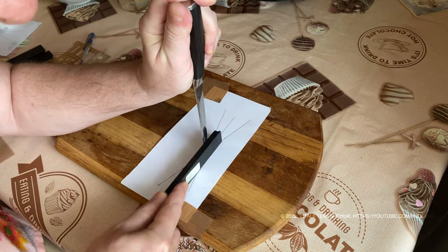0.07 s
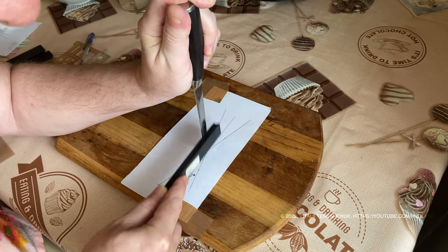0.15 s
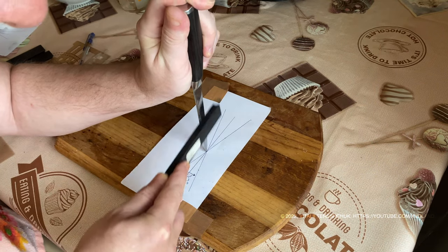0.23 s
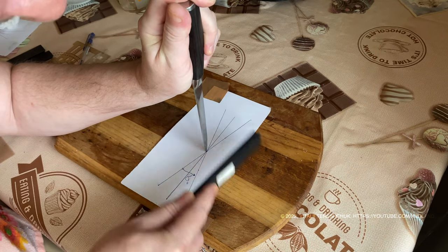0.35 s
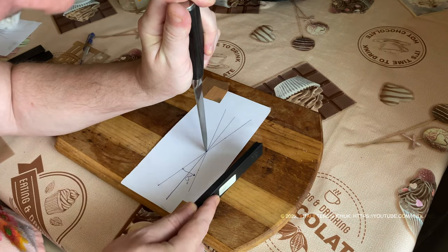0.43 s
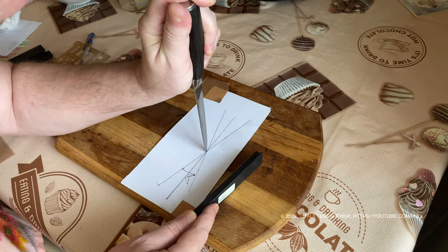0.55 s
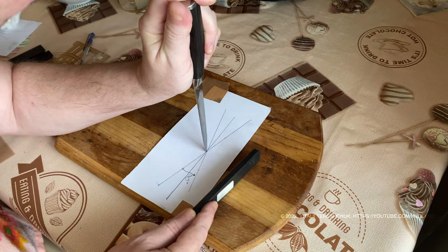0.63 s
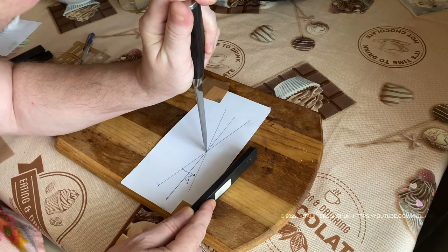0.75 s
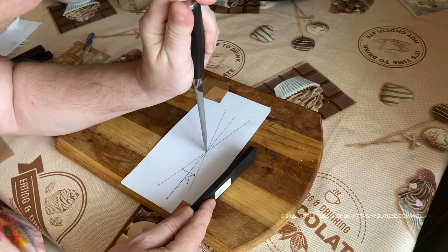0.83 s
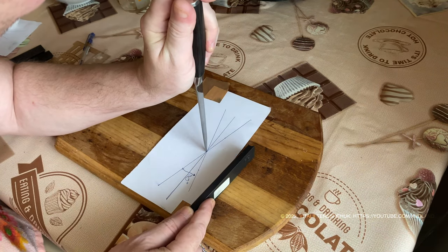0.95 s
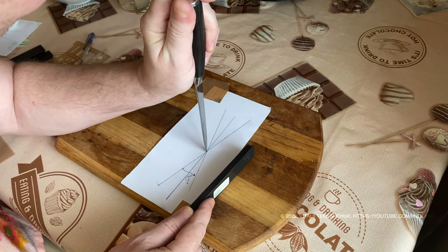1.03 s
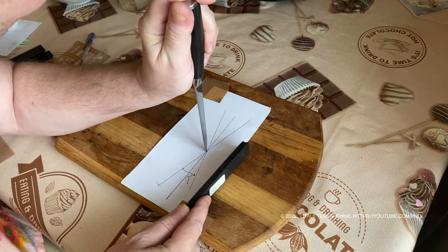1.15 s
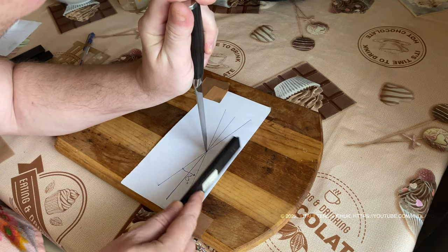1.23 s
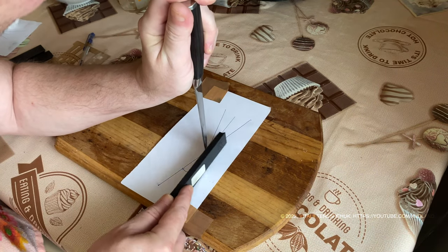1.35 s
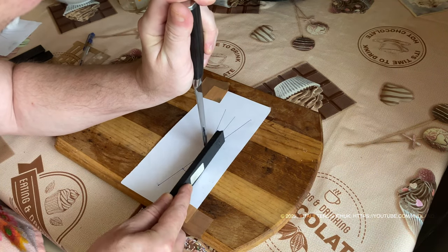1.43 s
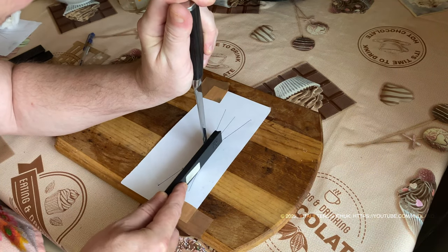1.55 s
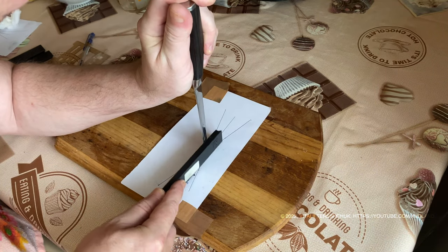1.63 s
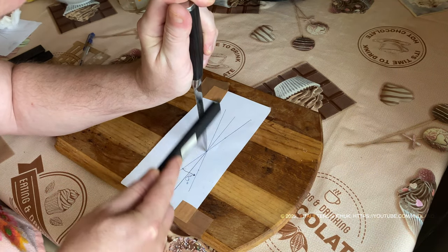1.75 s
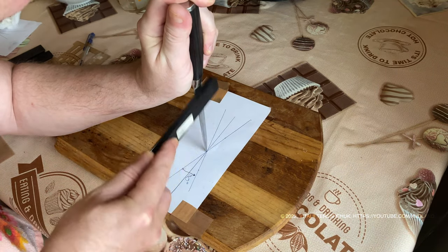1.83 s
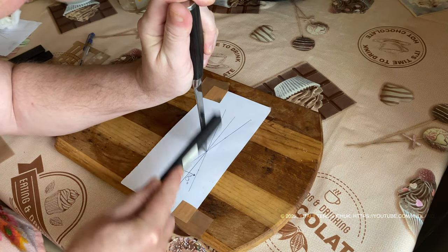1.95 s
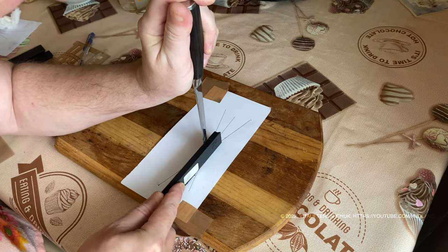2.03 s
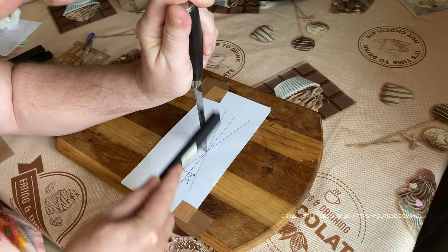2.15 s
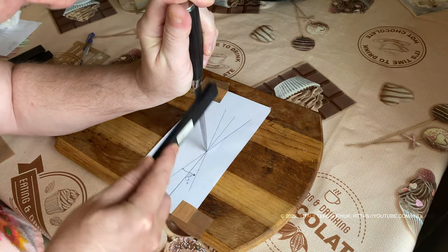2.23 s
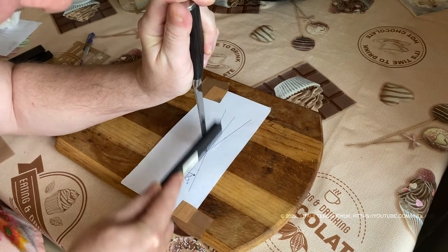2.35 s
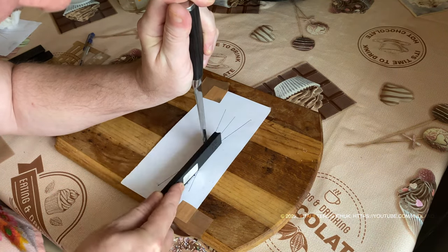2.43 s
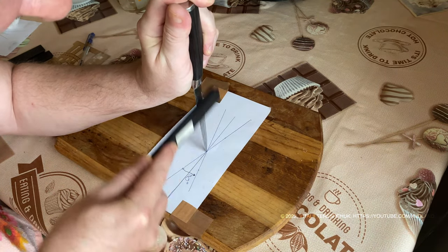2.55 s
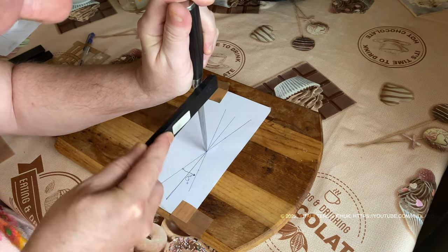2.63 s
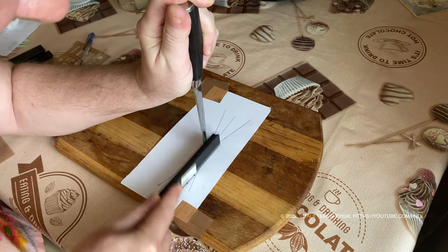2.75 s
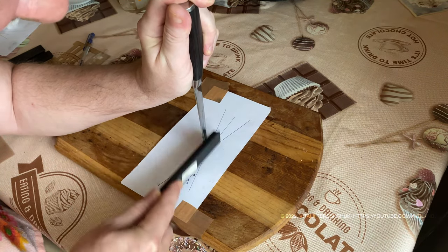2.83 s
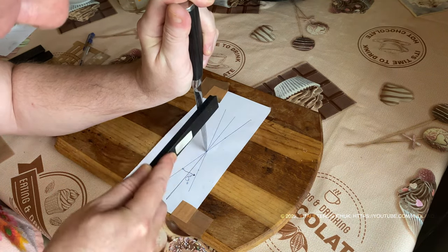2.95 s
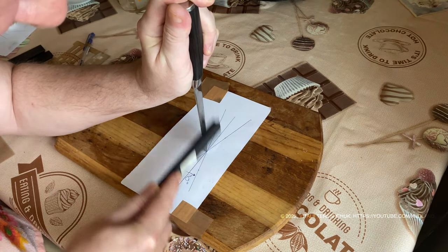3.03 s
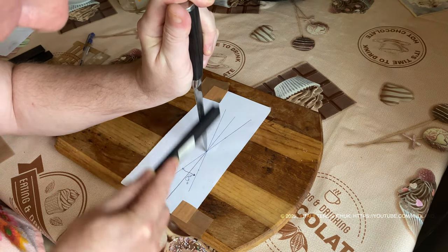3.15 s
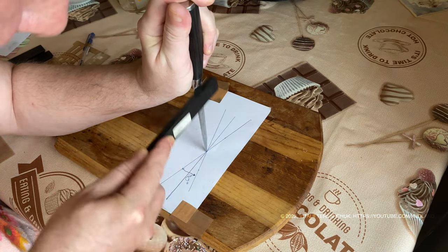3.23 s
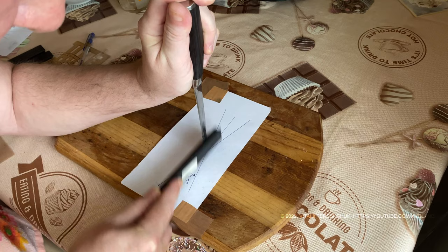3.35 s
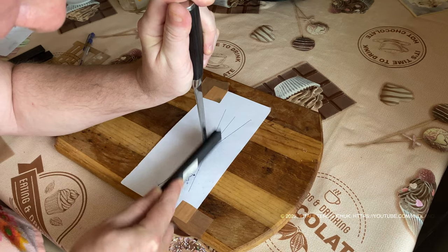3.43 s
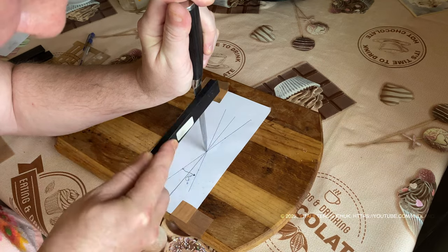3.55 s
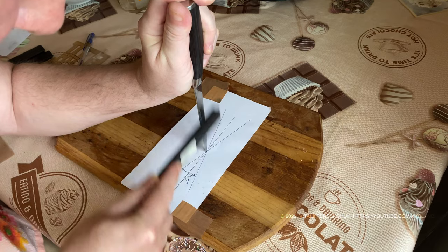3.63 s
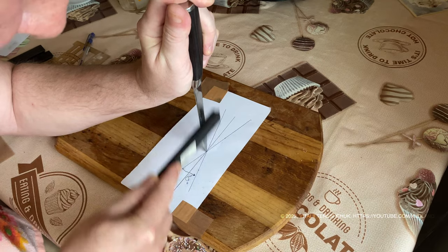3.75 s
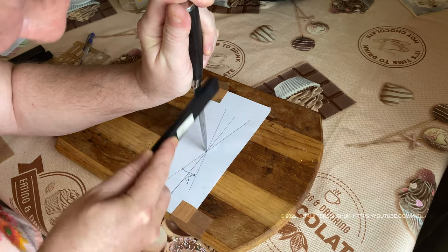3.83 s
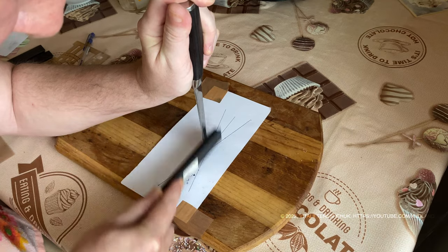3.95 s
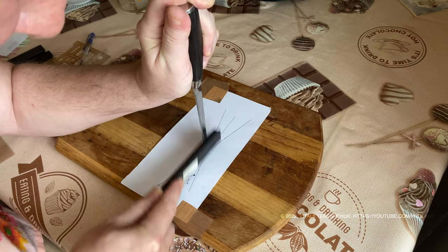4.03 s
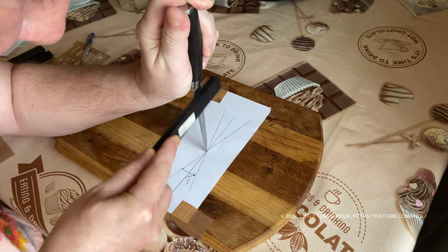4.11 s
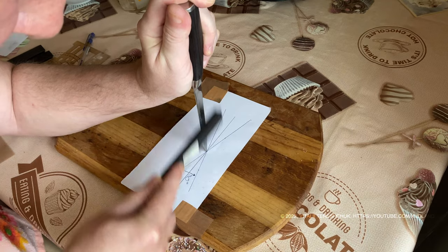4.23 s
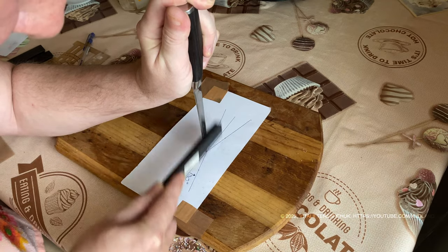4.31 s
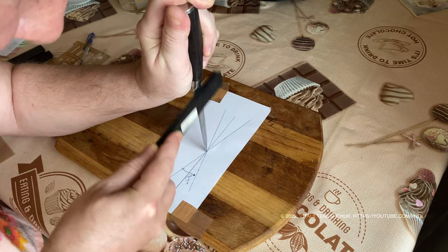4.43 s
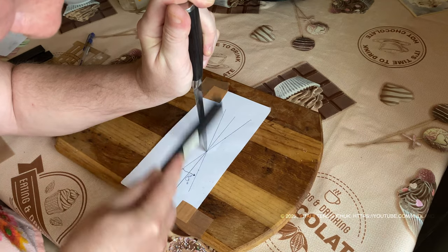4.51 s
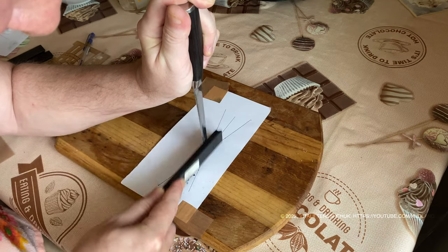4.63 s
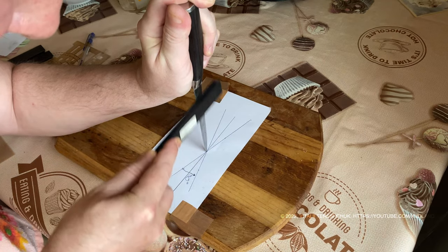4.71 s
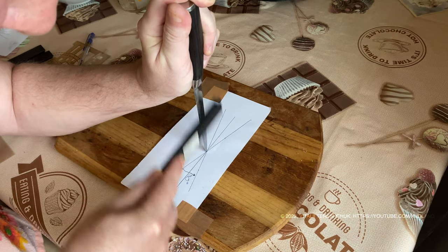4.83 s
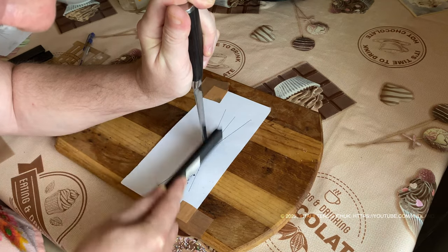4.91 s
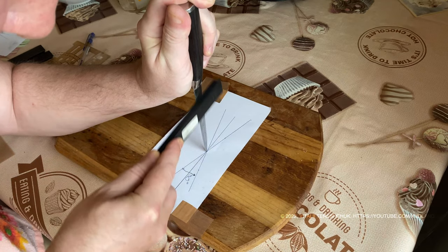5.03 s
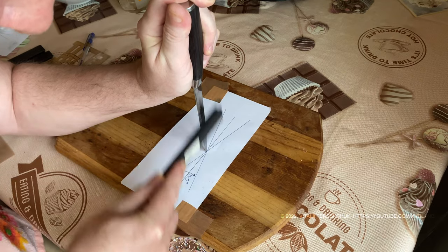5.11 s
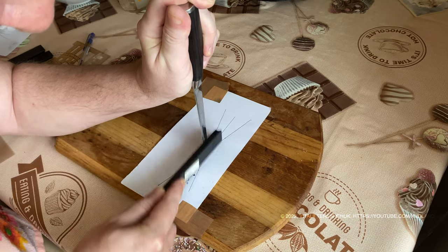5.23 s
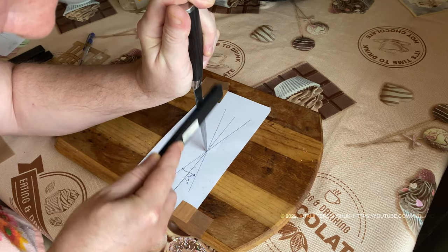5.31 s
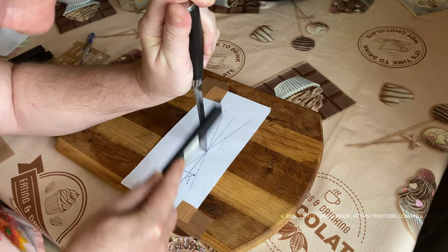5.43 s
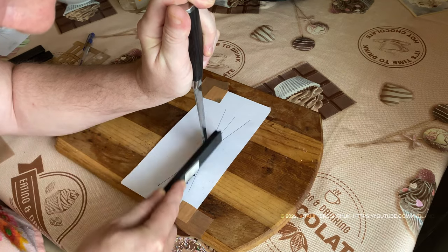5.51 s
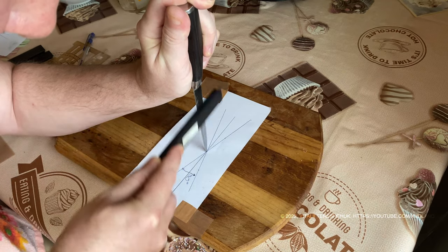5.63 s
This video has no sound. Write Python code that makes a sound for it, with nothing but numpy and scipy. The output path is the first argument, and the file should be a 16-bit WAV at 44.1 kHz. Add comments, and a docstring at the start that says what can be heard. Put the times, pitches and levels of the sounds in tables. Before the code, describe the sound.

A sharpening bar is worked by hand along a steel kitchen knife standing on its tip on a wooden board. A knock and a brief scrape give way to a pause with a few lighter taps. Then quick back-and-forth strokes run on, thin, high and gritty, with frequent sharp knocks that briefly ring the blade and board. The microphone is close, in a small room with a faint low background noise.

```python
"""A small room: a sharpening bar is drawn along a kitchen knife standing on its tip on a wooden board.
On each stroke grit rasps on the edge, rings the blade and shakes the board.
At the turns the bar knocks; knife, board and table ring briefly.
A hand-held pair of microphone ports sits close by and also picks up short reflections and room tone."""
import sys
import numpy as np
from scipy import signal
from scipy.fft import rfft, irfft
from scipy.io import wavfile
from scipy.ndimage import uniform_filter1d

SR = 44100
rng = np.random.default_rng(int(sys.argv[2]) if len(sys.argv) > 2 else 0)


def materialize(psi):
    """Save the field psi as 16-bit PCM at rate SR to the path in sys.argv[1].

    A 1-D psi becomes a single channel; in a 2-D psi each row is a channel.
    """
    bounded = np.clip(np.atleast_2d(psi).T, -1, 1)
    quanta = np.round(bounded * 32767).astype(np.int16)
    wavfile.write(sys.argv[1], SR, quanta)


N = 250047

# modes of knife and board together: (frequency [Hz], level [dB], t60 [s])
BODY_MODES = [(464, -0.5, 0.028), (572, 3.5, 0.032), (677.3, 6, 0.044), (692.5, 9, 0.036), (836, 11, 0.028),
              (896.6, 1, 0.093), (947.5, 4.5, 0.052), (1153, -1.5, 0.056), (1235, 9, 0.037),
              (1437, 0, 0.032), (1326, -0.5, 0.093), (1471.3, 8, 0.1), (1525, -16.5, .07),
              (1574, -3, 0.095), (1778, -4.5, 0.028), (1960, -4.5, 0.065), (2140, 0, 0.013),
              (2413, -10, 0.13), (2474, 4, 0.012), (2815, -5, 0.04), (3284, -6, 0.034), (3833, -3.5, 0.09),
              (4630, -14.5, 0.22), (5030, -25.5, .1)]


def gain_of(db):
    """dB to gain."""
    return 10 ** (np.asarray(db) / 20)


def unit_rms(x):
    """Scales to rms 1."""
    return x / np.sqrt(np.mean(x ** 2) + 1e-20)


def unit_peak(x):
    """Scales to peak 1."""
    return x / abs(x).max()


def curve_at(points, hz):
    """Interpolates a (frequency [Hz], value) table on a log-frequency axis."""
    point_hz, value = np.transpose(points)
    return np.interp(np.log(hz + 1), np.log(point_hz + 1), value)


def coloured(x, points):
    """Filters by a (frequency [Hz], gain [dB]) table."""
    hz = np.fft.rfftfreq(x.shape[-1], 1 / SR)
    return irfft(rfft(x) * gain_of(curve_at(points, hz)), x.shape[-1])


def add(mix, start_s, sound):
    """Mixes in a two-channel sound."""
    part = mix[:, round(start_s * SR):][:, :sound.shape[1]]
    part += sound[:, :part.shape[1]]


def diffuse_noise(coherence, size):
    """Two-channel noise with a given left-right coherence per frequency."""
    left, other = rfft(rng.standard_normal((2, size)))
    shared = np.clip(curve_at(coherence, np.fft.rfftfreq(size, 1 / SR)), -1, 1)
    return irfft(np.array([left, shared * left + np.sqrt(1 - shared ** 2) * other]), size)


def resonate(x, hz, width_hz):
    """Moving band-pass: shifts hz down to zero, smooths twice, shifts back."""
    carrier = np.exp(2j * np.pi * np.cumsum(hz) / SR)
    pole = np.exp(-np.pi * width_hz / SR)
    smoothed = signal.lfilter([(1 - pole) ** 2], [1, -2 * pole, pole * pole], x / carrier)
    return 2 * (carrier * smoothed).real


def ring(modes, colour, spread_db, t60_factor=1.):
    """Modes after one tap; the spot struck favours some over others."""
    hz, db, t60_s = np.transpose(modes)[:, :, None]
    t = np.arange(SR // 2) / SR
    db = db + curve_at(colour, hz) + spread_db * rng.standard_normal(hz.shape)
    sign = (-1.) ** np.arange(len(hz))[:, None]  # neighbouring modes move in opposition
    return (sign * gain_of(db - 60 * t / (t60_s * t60_factor)) * np.sin(2 * np.pi * hz * t)).sum(0)


def radiated(x):
    """The small board radiates little bass."""
    return signal.sosfilt(signal.butter(4, 430, "high", fs=SR, output="sos"), x)


def room_tone():
    """Steady low noise, alike on both sides in the bass."""
    # room tone: (frequency [Hz], density [dB])
    spectrum = [(12, -43.5), (20, -20), (48, -7.5), (103, -9), (167, -10), (205, -12.5), (233, -13.5),
                (341, -10), (369, -15), (1020, -16), (2640, -29.5), (4750, -25), (9000, -44.5),
                (11700, -83), (19800, -120)]
    # left-right likeness: (frequency [Hz], coherence [-1..1])
    coherence = [(60, 1), (150, 1), (350, 0.21), (900, 0.12), (1700, -0.07), (3000, -0.12)]
    return gain_of(-63) * unit_rms(coloured(diffuse_noise(coherence, N), spectrum))


def reflections(x):
    """Short tail, each band dying at its own rate; two tails alternate as the hands move."""
    # room decay: (frequency [Hz], t60 [s])
    decay = [(60, 1), (160, 0.46), (420, 0.32), (1100, 0.25), (2900, 0.24), (7700, 0.3), (12000, 0.063)]
    # reflection strength: (frequency [Hz], gain [dB])
    colour = [(100, -6), (300, 3.5), (700, -1), (1500, 2), (4000, 1), (10000, -6)]
    # left-right likeness: (frequency [Hz], coherence [-1..1])
    coherence = [(90, .97), (160, .85), (300, .2), (1000, 0), (3000, -.1), (8500, 0), (10000, .7)]
    out, t = np.zeros((2, N)), np.arange(N) / SR
    x = coloured(x, colour)
    for share in (np.cos(2.044 * t), np.sin(2.03 * t)):
        hz, lag_s, bands = signal.stft(diffuse_noise(coherence, SR // 2), SR, nperseg=256)
        fade = gain_of(-60 * lag_s / curve_at(decay, hz)[:, None])
        tail = signal.istft(bands * fade, SR, nperseg=256)[1]
        tail *= np.clip(np.arange(tail.shape[1]) / SR / 0.0082 - .3, 0, 1)  # delay to the first walls
        out += signal.fftconvolve((x * share)[None], tail / np.linalg.norm(tail[0]), axes=1)[:, :N]
    return out


def ports(x):
    """Near sound reaches the two ports with its own balance and lead at each frequency."""
    # port balance: (frequency [Hz], left over right [dB])
    balance = [(100, 0), (250, 1), (1500, -.5), (2800, 2), (5500, 5), (7200, 1), (10000, 0)]
    # port phase: (frequency [Hz], left lead [rad])
    lead = [(100, 0), (400, .3), (1700, .1), (2400, 1.2), (4000, 2.1), (4700, 1), (6000, -.8), (7000, -1.3),
            (8000, -3.1), (9000, -5), (9500, -6), (12000, -6.28)]
    hz = np.fft.rfftfreq(N, 1 / SR)
    left = gain_of(curve_at(balance, hz) / 2) * np.exp(.5j * curve_at(lead, hz))
    return irfft(rfft(x) * np.array([left, 1 / left]), N)


def knocks():
    """The bar lands and chatters: board and knife ring, the steel cracks, the table thumps."""
    # blows: (time [s], level [dB], thump [dB], board [dB], knife [dB], crack [dB], snap [dB],
    # t60 [factor]); thump to snap are relative; a bar kept pressed on the edge shortens the ring
    blows = [(0.014, -10, -29, 4, 4.5, -14, -27, 0.74), (0.483, -17.5, -28.5, 2.5, -6.5, -16, -30, 0.61),
             (1.307, -24.5, -26, 12, 8.5, -30, -27, 0.55), (1.444, -41, -42, 13, 10, -1.5, -13, 0.83),
             (1.8, -33, -33, 27, 13, -21.5, -19, 0.48), (1.962, -7, -25, 2.5, 4, -11.5, -26.5, 1),
             (2.346, -4.5, -24, 2, 0, -8, -24.5, 0.75), (2.546, -17, -32, 10.5, -0.5, -17.5, -41, 0.85),
             (2.722, -2, -24, 4, 3, -10, -29, 0.62), (3.012, -8.5, -27.5, 4.5, 7.5, -11.5, -23, 1),
             (3.195, -25, -21, 12.5, 0, -16.5, -23, 1), (3.332, -7, -26, -0.5, -1.5, -11.5, -27, 0.88),
             (3.633, -11.5, -29, 8, 9, -13.5, -31, 0.56), (3.931, -11.5, -30.5, 5.5, 7, -13, -25, 0.78),
             (4.225, -8.5, -27.5, 3.5, 5, -11, -23.5, 0.8), (4.396, -22.5, -26, 15.5, 0, -22, -29, 0.94),
             (4.534, -9.5, -31, 4, 5, -14, -32, 0.87), (4.828, -4, -29, 2, 5, -9, -20.5, 0.94),
             (5.132, -15.5, -28.5, 5, 6.5, -14, -28, 0.93), (5.437, -11, -27.5, 4.5, 5, -11.5, -21.5, 0.9)]
    # blade at first contact: (frequency [Hz], density [dB])
    crack_spectrum = [(1200, -26.5), (1700, 0.5), (2100, -3.5), (2600, -12.5), (3700, -10), (5000, -16.5),
                      (7000, -26), (8500, -48)]
    # steel on stone: (frequency [Hz], density [dB])
    snap_spectrum = [(6000, -37), (7500, 9.5), (9500, 3), (12000, -7.5), (13500, -19.5)]
    # table under the board: (frequency [Hz], level [dB], t60 [s])
    table_modes = [(44.2, -10.5, 0.015), (57.1, -23, .15), (72.4, -4.5, 0.22), (90, -2, 0.13),
                   (115.3, -4.5, 0.22), (142, -4.5, 0.12), (187, 0, 0.098), (227.5, 0.5, 0.085),
                   (288, -1.5, 0.059), (392, -4.5, 0.06)]
    chatter_s, left_over_right_db = .0053, 1.55
    pan = gain_of([[left_over_right_db / 2], [-left_over_right_db / 2]])
    out, t = np.zeros((2, N)), np.arange(2048) / SR
    for time_s, db, thump_db, board_db, knife_db, crack_db, snap_db, t60_factor in blows:
        grains, jolt, crack, snap = rng.standard_normal((4, len(t)))
        chatter = .04 * grains * np.sqrt(t / chatter_s) * np.exp(-2 * t / chatter_s)
        blow = .2 * np.exp(-((t - 0.2953 * chatter_s) / 0.000073) ** 2)
        colour = [(950, board_db), (1200, 0), (1420, 0), (1440, knife_db), (1495, knife_db), (1505, 0)]
        modes = ring(BODY_MODES, colour, spread_db=1.5, t60_factor=t60_factor)
        knock = unit_peak(radiated(signal.oaconvolve(modes, chatter + blow)))
        crack = unit_rms(coloured(crack, crack_spectrum)) * np.minimum(t / 0.00017, 1)
        snap = unit_rms(coloured(snap, snap_spectrum)) * np.minimum(t / .0004, 1)
        knock[:len(t)] += gain_of(crack_db - 60 * t / (6.5 * chatter_s)) * crack
        knock[:len(t)] += gain_of(snap_db - 60 * t / 0.025) * snap
        jolt = (jolt + 0.14) * t * np.exp(-t / 0.0046)  # board and table take a while to rock
        table = ring(table_modes, [(100, 0.0048)], spread_db=1.2)
        knock += gain_of(thump_db) * unit_peak(signal.oaconvolve(table, jolt))
        add(out, time_s - .001, gain_of(db) * knock * pan)
    return out


def stroke_motion():
    """Each stroke speeds up and slows once; rasp, board, blade flat and rasp pitch follow the speed."""
    # up and down in turn: (start [s], length [s], fastest at [0..1], pointedness [exponent],
    # rasp [dB], board re rasp [dB], blade flat re rasp [dB], rasp centre [Hz])
    strokes = np.array([(-.1, 0.12, 0.8, 1.2, -47.5, 10, -1.5, 9700),
                        (0.076, 0.24, 0.31, 6.7, -52.5, -5.5, 1, 9900),
                        (1.17, .1, .3, 2.5, -74, -4, 3.5, 10600), (1.439, 0.12, 0, 3, -52, -4, 3.5, 10750),
                        (1.574, 0.24, 0.49, 0.57, -56, -0.5, -4, 10300),
                        (1.825, 0.18, 0.5, 0.99, -48.5, -4.5, -4, 10930),
                        (2.04, 0.2, .35, 1.06, -53, -13, -1.5, 10450),
                        (2.23, 0.15, 0.56, 0.6, -50.5, -4, -1.5, 10510),
                        (2.395, 0.22, 0.4, 1.5, -52, 1, -2, 9980),
                        (2.605, 0.15, 0.58, 0.9, -47, -3.5, -4.5, 10600),
                        (2.765, .17, 0.2, 1.2, -52, 2.5, -2.5, 10250),
                        (2.929, 0.1, 0.6, 1, -44, 0.5, 0, 10490),
                        (3.054, 0.17, 0.2, 0.9, -51, 3, -1, 10470),
                        (3.231, 0.15, 0.51, 1, -48, -1, 0, 10520),
                        (3.385, 0.19, 0.1, 1.35, -48.5, -5, -3.5, 10570),
                        (3.522, .135, 0.7, 0.46, -48, 0, -2.5, 10570),
                        (3.663, .156, 0.3, 1.17, -47, -7, -4, 10100),
                        (3.82, .13, 0.57, 0.59, -48, -2, -3, 10600),
                        (3.958, 0.16, 0.42, 1.6, -44, -6, -5.5, 10580),
                        (4.114, 0.17, 0.46, 1.2, -47, -1.5, -3, 10190),
                        (4.266, 0.16, 0.34, 1.7, -44.5, -6, -1.5, 10440),
                        (4.424, 0.15, 0.58, 0.85, -48, -1, 0.5, 10420),
                        (4.582, .148, 0.37, 1.2, -48, -1, -4, 10370),
                        (4.73, 0.13, 0.54, 1.1, -43, -5.5, -4.5, 10650),
                        (4.865, 0.17, 0.32, 1.3, -46, -7, -4, 10600),
                        (5.016, 0.14, 0.6, 1, -45.5, -3, -4.5, 10740),
                        (5.159, 0.16, 0.51, 1.16, -47.5, -2, -4, 10760),
                        (5.308, 0.16, 0.7, 0.73, -46, -0.5, -2.5, 10020),
                        (5.468, .178, 0.4, 1.04, -49, -4.5, -3, 10500),
                        (5.646, .15, 0.6, 0.87, -44, -1.5, 0, 10570)])
    board_follow, flat_follow = 0.82, 0.92  # below 1: follows the speed less than the rasp
    rise_hz, pressed_from_s = 150, 1.58
    t = np.arange(N) / SR
    current = np.clip(np.searchsorted(strokes[:, 0], t) - 1, 0, None)
    start_s, length_s, fastest, pointedness, rasp_db, board_db, flat_db, _ = strokes[current].T
    progress = np.clip((t - start_s) / length_s, 0, 1)
    skew = np.log(.5) / np.log(np.clip(fastest, .05, .95))
    speed = np.where(progress < 1, abs(np.sin(np.pi * progress ** skew)), 0)
    pressed = t > pressed_from_s  # the bar stays on the edge and grinds even at the turns
    rasp = gain_of(rasp_db) * speed ** pointedness + pressed * gain_of(-76)
    board = gain_of(rasp_db + board_db) * speed ** (board_follow * pointedness) + pressed * gain_of(-62.5)
    flat = gain_of(rasp_db + flat_db) * speed ** (flat_follow * pointedness) + pressed * gain_of(-69.5)
    fastest_s = strokes[:, 0] + strokes[:, 1] * strokes[:, 2]
    rasp_hz = np.interp(t, fastest_s, strokes[:, -1]) - rise_hz * (1 - speed)
    return rasp, board, flat, rasp_hz


def grit_force():
    """Dense grit of uneven size; the bar grips and slips in patches, most in the treble."""
    grains = unit_rms(rng.standard_normal(N) * gain_of(3.6 * np.minimum(rng.exponential(1, N), 5)))
    hz, _, bands = signal.stft(grains, SR, nperseg=256)
    patches = uniform_filter1d(rng.standard_normal(bands.shape), 4, axis=0)
    patches = unit_rms(uniform_filter1d(patches, 8, axis=1))
    grip_db = curve_at([(1000, 2.5), (5000, 3.5), (10000, 4.46)], hz)[:, None]
    return unit_rms(signal.istft(bands * gain_of(grip_db * patches), SR, nperseg=256)[1][:N])


def scrape():
    """Grit rasps at a pitch that moves with the contact point, rings the blade and shakes the board."""
    # grit on steel: (frequency [Hz], density [dB])
    hiss_spectrum = [(1400, -30.5), (1800, -11), (2830, -20.5), (3970, -9), (5600, -16), (7300, -5.5),
                     (7700, -19), (8600, -10), (9300, -9), (10300, -2.5), (11700, -11), (12000, -32.5),
                     (12300, -84.5)]
    # rasp resonances: (frequency re rasp centre [factor], width [Hz], level [dB])
    rasp_bands = [(.92, 500, -12), (0.998, 300, 0.5), (1.06, 350, -1)]
    # blade resonances: (frequency [Hz], width [Hz], level [dB])
    blade_modes = [(3870, 35, -12.5), (5050, 110, -19.5), (6590, 79, -5), (7655, 140, -3.5)]
    # drive of the body modes by rubbing: (frequency [Hz], gain [dB])
    rub_colour = [(450, -22.5), (600, 8.5), (900, -4.5), (1200, -12.5), (1500, -12), (2200, -5.5),
                  (4000, -21.5)]
    rasp_gain, board_gain, flat_gain, rasp_hz = stroke_motion()
    grit = grit_force()
    hiss = unit_rms(coloured(grit, hiss_spectrum))
    low_hiss = signal.sosfiltfilt(signal.butter(8, 8000, fs=SR, output="sos"), hiss)
    rasp = sum(gain_of(db) * resonate(hiss, factor * rasp_hz, width_hz)
               for factor, width_hz, db in rasp_bands)
    edge = rasp_gain * (hiss - low_hiss + gain_of(-13.5) * unit_rms(rasp))
    t = np.arange(2048) / SR
    blade_ring = sum(gain_of(db) * np.sqrt(width_hz) * np.exp(-np.pi * width_hz * t)
                     * np.sin(2 * np.pi * hz * t) for hz, width_hz, db in blade_modes)
    blade = gain_of(-10.5) * unit_rms(signal.oaconvolve(grit, blade_ring)[:N])
    flat = flat_gain * (low_hiss + blade)
    board_ring = radiated(ring(BODY_MODES, rub_colour, spread_db=0))
    board = signal.oaconvolve(grit * board_gain, board_ring / np.linalg.norm(board_ring))[:N]
    return edge + flat + board


def scene():
    """Knocks and scraping near the ports, their reflections, and room tone."""
    hits, rub = knocks(), scrape()
    to_room = gain_of(-6.5) * hits.mean(0) + gain_of(-4.5) * rub
    return ports(hits + rub) + reflections(to_room) + room_tone()


def record(dry):
    """The input stage rounds off the tallest peaks; a low-pass follows."""
    ceiling, cutoff_hz = .97, 13060
    rounded = dry / (1 + (dry / ceiling) ** 4) ** .25
    low_pass = signal.firwin(511, cutoff_hz, window=("kaiser", 9), fs=SR)
    return signal.oaconvolve(rounded, low_pass[None], "same")


dry = scene()
out = record(dry)
materialize(out)
```